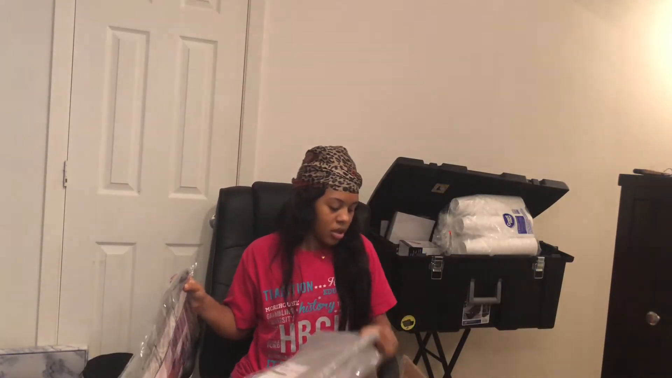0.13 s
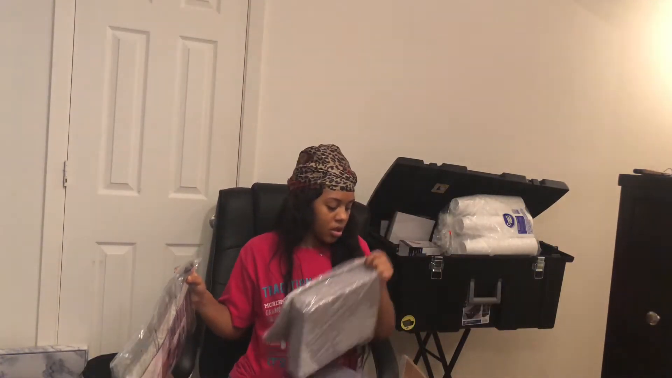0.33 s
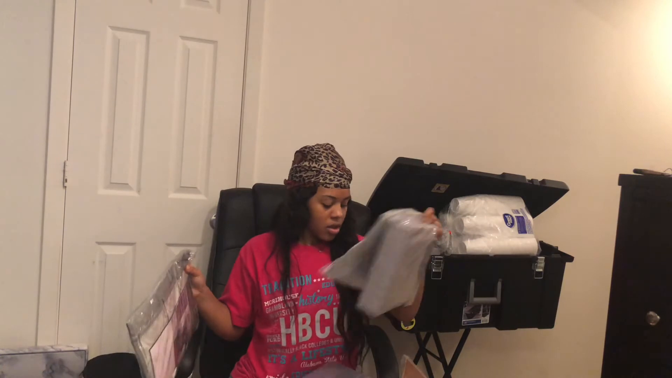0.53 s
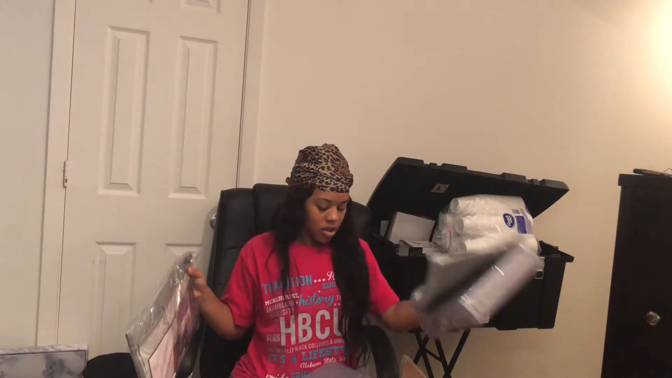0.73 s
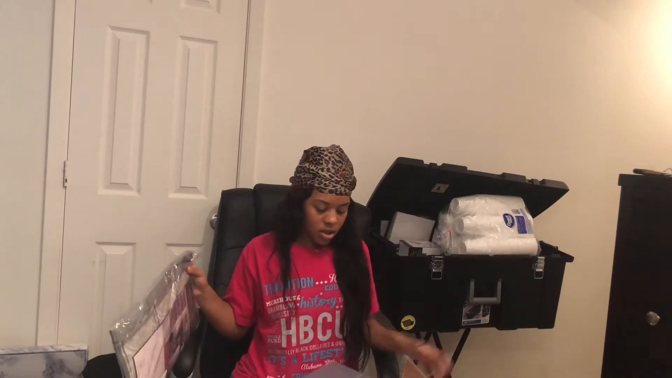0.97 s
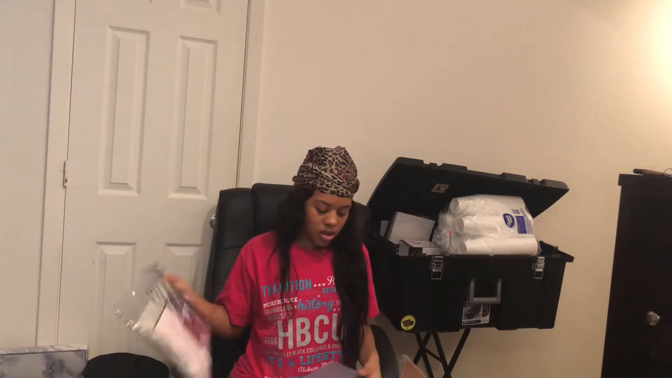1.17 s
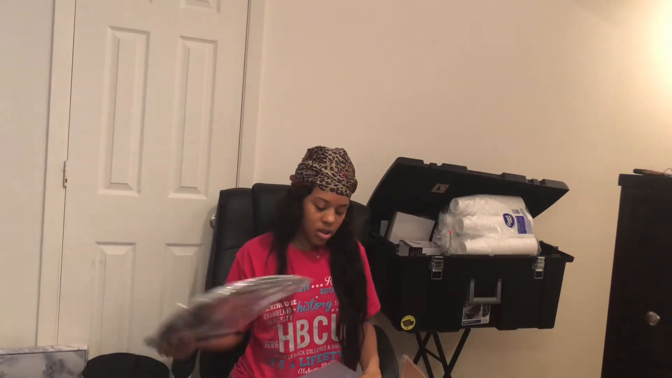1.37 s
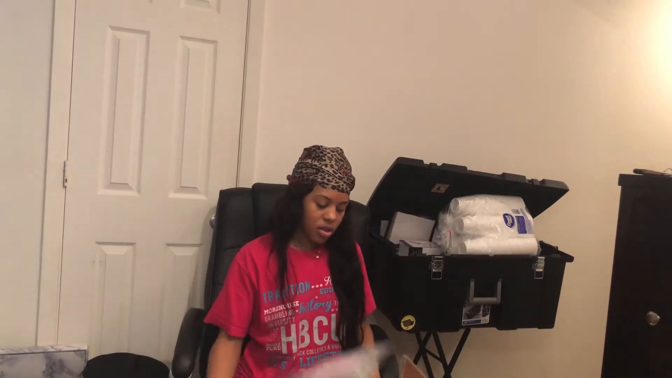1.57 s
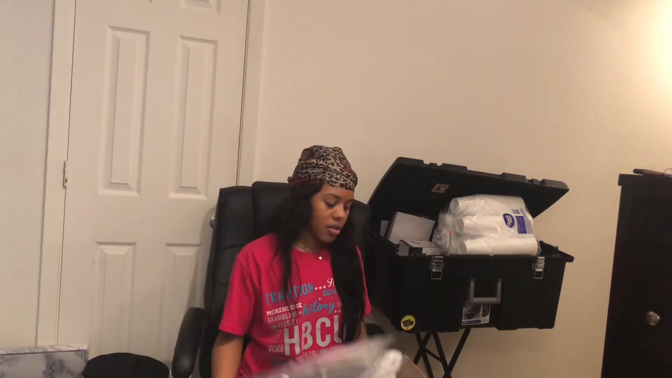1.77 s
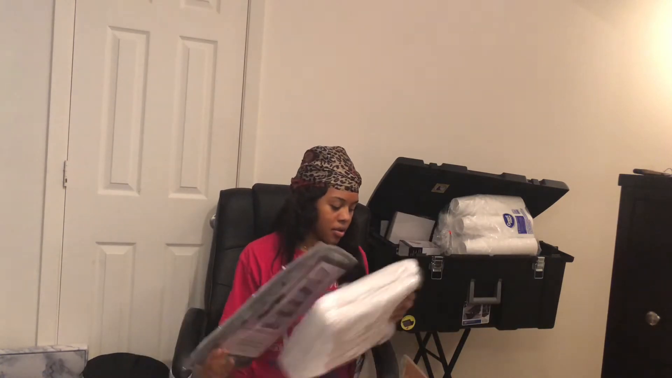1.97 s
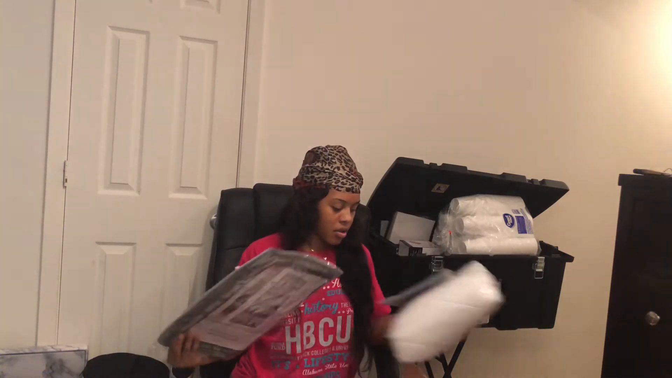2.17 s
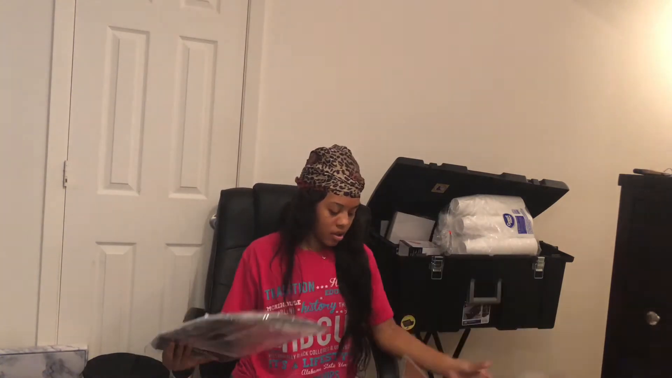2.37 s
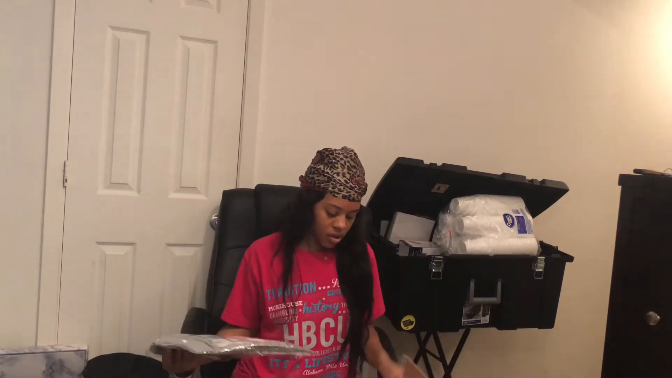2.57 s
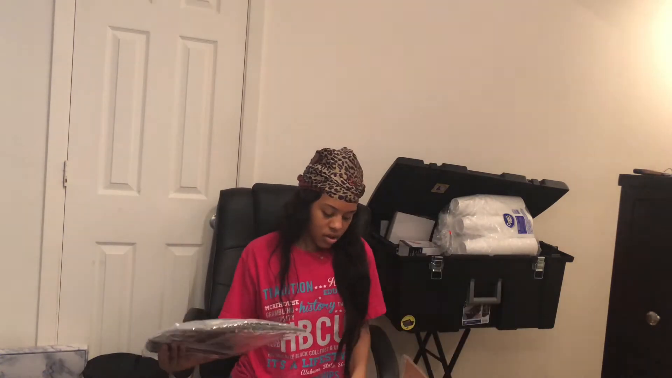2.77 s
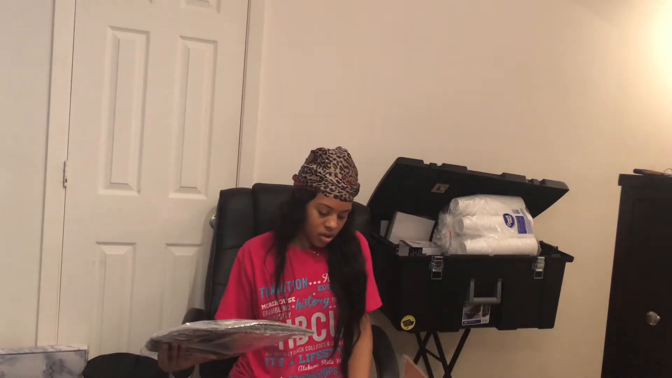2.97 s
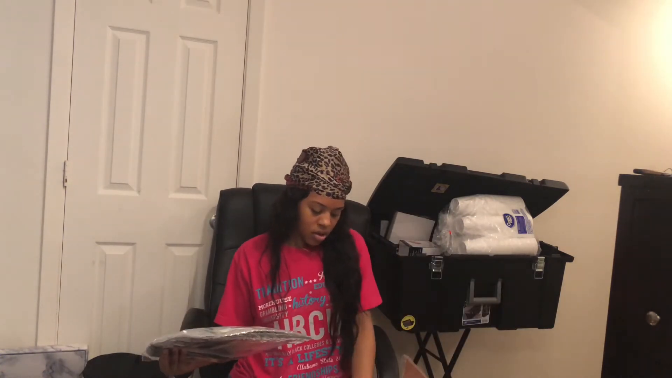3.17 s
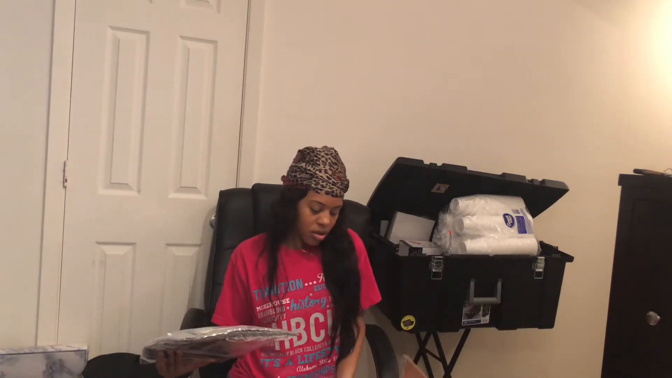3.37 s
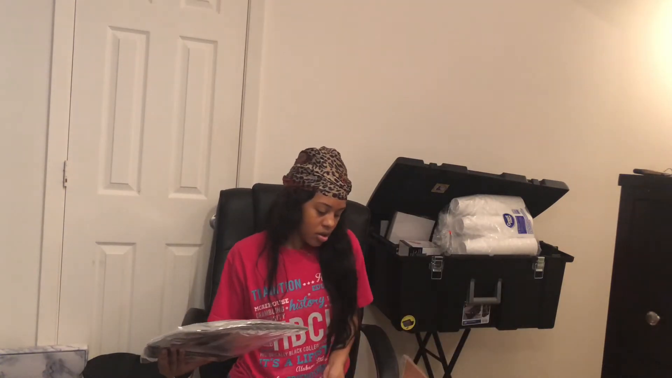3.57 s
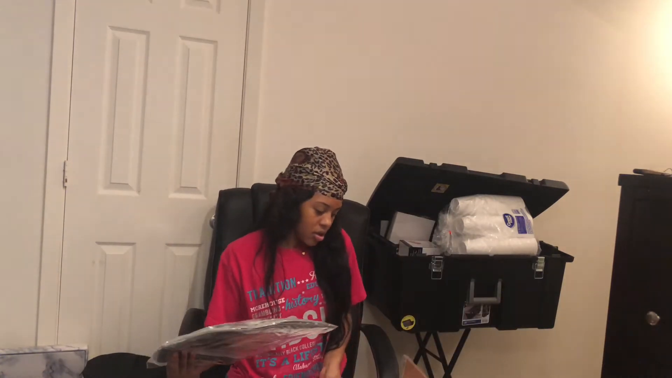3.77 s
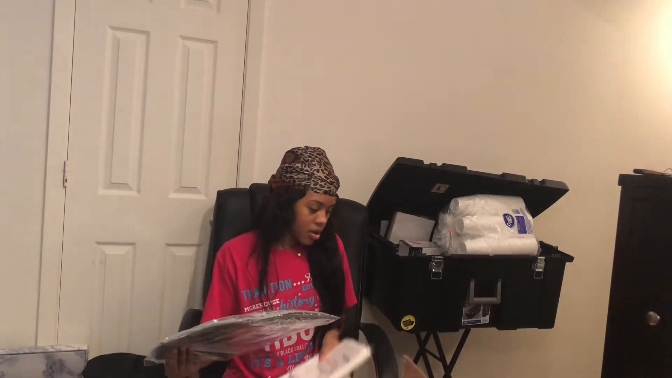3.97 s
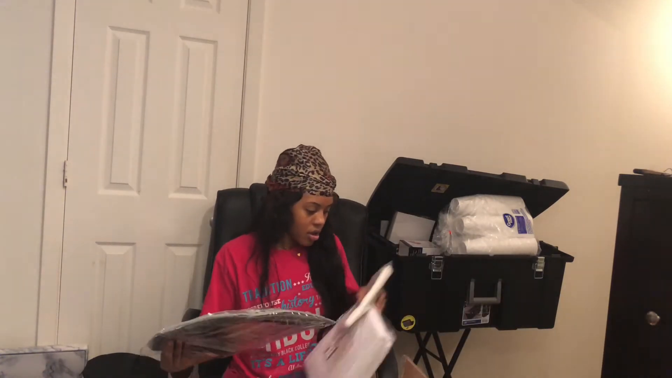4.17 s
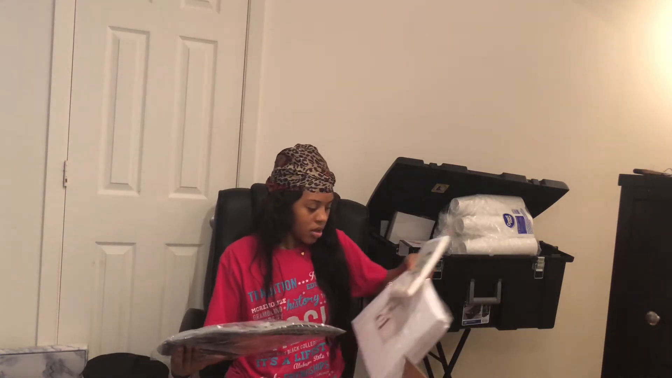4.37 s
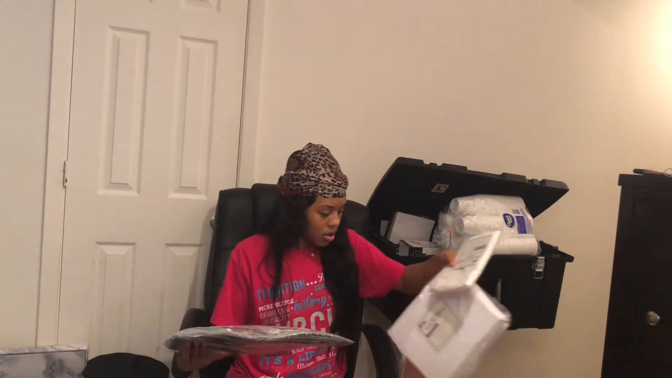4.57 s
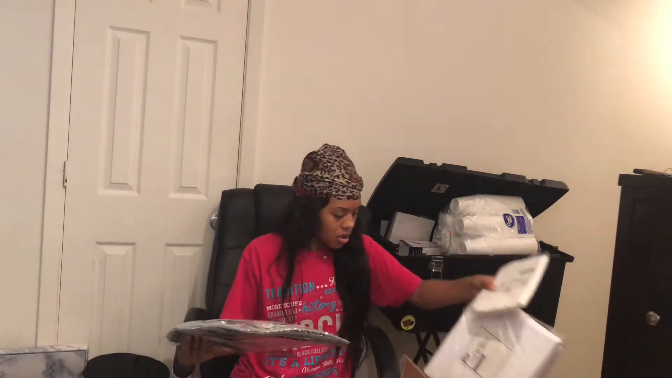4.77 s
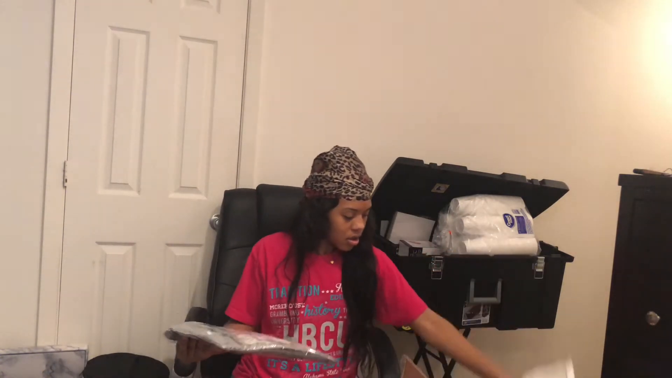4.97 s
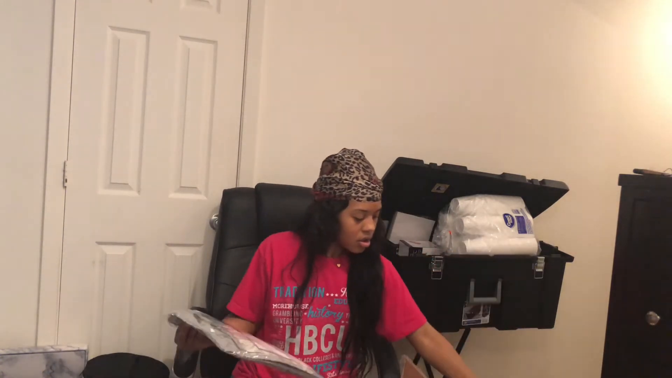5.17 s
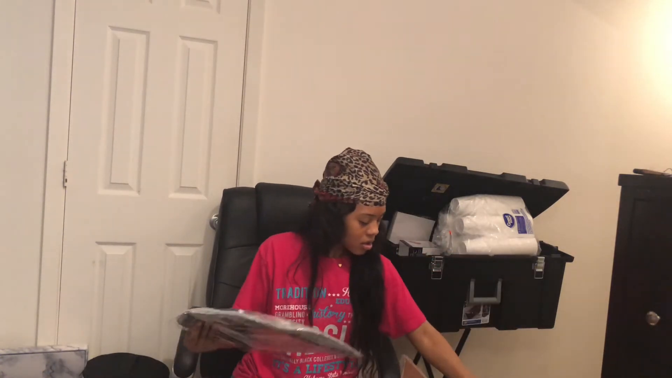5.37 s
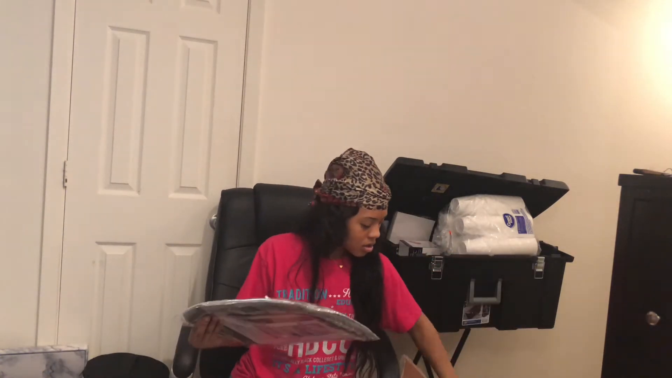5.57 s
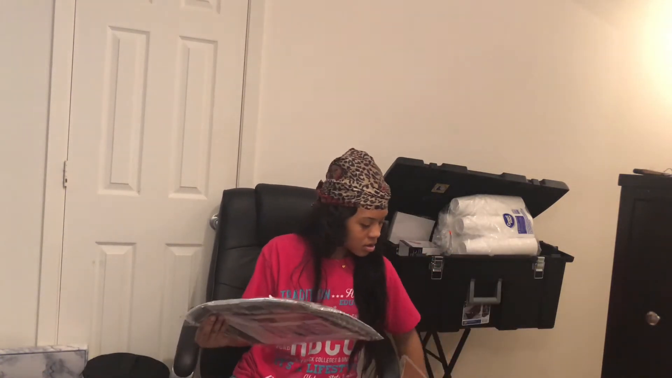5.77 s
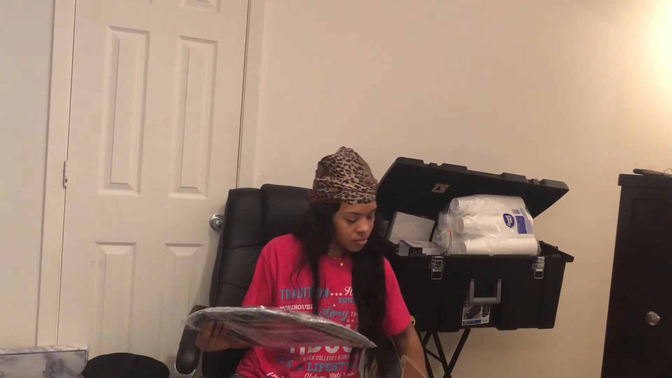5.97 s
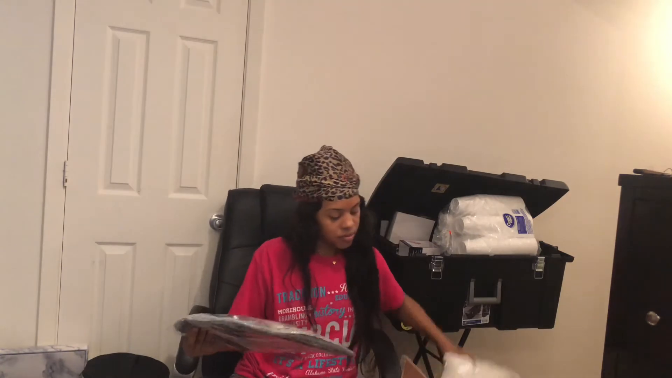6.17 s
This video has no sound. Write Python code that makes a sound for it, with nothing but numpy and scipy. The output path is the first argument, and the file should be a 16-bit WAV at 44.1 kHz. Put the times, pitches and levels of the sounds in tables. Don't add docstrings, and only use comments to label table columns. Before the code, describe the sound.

Plastic-wrapped soft packs are sorted by hand, heard close and dry with a short room echo. Film crinkles irregularly, creases tick, dimples pop and tiny squeaks slip through. Two abrupt crackly thumps stand out in the first half; afterwards the handling is quiet and patchy until a moderate crush and thud near five seconds, then small bumps and rustles. A low hum stays beneath.

```python
import sys
import numpy as np
from scipy import signal
from scipy.fft import rfft, irfft
from scipy.io import wavfile
from scipy.ndimage import uniform_filter1d

SR = 44100
rng = np.random.default_rng(int(sys.argv[2]) if len(sys.argv) > 2 else 0)


def natural_amplitude(level_db):
    exponent = np.asarray(level_db, float) / 20
    return 10 ** exponent


def transcribe(u):
    v = np.clip(np.atleast_2d(u).T, -1, 1)
    q = np.round(v * 32767).astype(np.int16)
    wavfile.write(sys.argv[1], SR, q)


N = 273861


def rms_one(x):
    return x / np.sqrt(np.mean(x ** 2) + 1e-20)


def across(points_hz, values, hz):
    return np.interp(np.log(hz), np.log(points_hz), values)


def drift(rate_hz):
    r = np.exp(-40 * np.pi * rate_hz / SR)
    slow = signal.lfilter([1], [1, -2 * r, r * r], rng.standard_normal(N // 20 + 2002))[2000:]
    return np.interp(np.arange(N) / 20, np.arange(len(slow)), rms_one(slow))


def ring(clicks, hz, t60):
    r = natural_amplitude(-60 / (max(t60, .004) * SR))
    w = 2 * np.pi * hz / SR
    return signal.lfilter([0, np.sin(w)], [1, -2 * r * np.cos(w), r * r], clicks + 1e-18)


def band(x, low_hz, high_hz):
    return signal.sosfilt(signal.butter(2, [low_hz, high_hz], "band", fs=SR, output="sos"), x)


def buckles(per_s, spread_db):
    sizes = natural_amplitude(spread_db * np.minimum(rng.exponential(1, N), 4.5)) * rng.choice([-1, 1], N)
    return rms_one(sizes * (rng.random(N) < per_s / SR))


def swell(t, s, rise_s, hold_s, fall_s, db):
    before = np.maximum(s - t, 0)
    after = np.maximum(t - s - max(hold_s, 0), 0)
    return natural_amplitude(db - 20 * (before / max(rise_s, .002) + after / max(fall_s, .003))) ** 2


def hum():
    # (pitch [Hz], level [dB])
    hum_curve = [(15, -40), (25, -18), (53, 0.5), (76, 1.5), (161, -4), (352, -5.5), (449, -13),
                 (929, -18.5), (3680, -22.5), (5090, -22), (8000, -26.5), (15800, -28)]
    hz = np.maximum(np.fft.rfftfreq(N, 1 / SR), 1)
    shaped = rfft(rng.standard_normal(N)) * natural_amplitude(across(*np.transpose(hum_curve), hz))
    return natural_amplitude(-63.5) * rms_one(irfft(shaped, N))


def handling():
    # (time [s], hold [s], fall [s per 20 dB], rustle [dB], tautness [dB])
    crushes = [(0.0, 0.082, .5, -51, -0.5), (0.25, 0.14, 0.13, -54.5, -0.5),
               (1.026, 0.065, 0.0836, -30.5, 0), (1.16, 0.01, 0.33, -49, -1.5),
               (1.207, 0.038, -0.16, -50.5, -2.5), (1.616, 0.051, 0.12, -43.5, -1),
               (1.883, 0.03, -0.03, -48.5, 4.5), (2.485, 0.011, 0.11, -38.5, -1),
               (2.569, 0.0091, .2, -40, 0), (2.68, 0.26, 0.23, -52, -1), (3.143, 0.14, 0.2, -56, -1.5),
               (3.535, 0.062, 0, -56, -0.5), (3.465, 0.066, -0.5, -63, -1), (3.09, 0.053, -0.7, -62.5, -7),
               (3.782, 0.034, -0.5, -65.5, -4), (1.326, 0.036, 0.2, -64, -7), (3.893, .04, 1, -63, -5),
               (3.935, .05, 0.5, -55, -1), (4.276, 0.006, -0.06, -59, 1), (4.28, 0.009, 0.14, -61, -4),
               (0.487, 0.07, -0.03, -65, -4), (0.7, 0.036, 1, -66.5, -2), (2.135, 0.047, -0.2, -72, -9.5),
               (4.634, 0.016, -0.06, -63, 4), (4.817, 0.015, -0.05, -64.5, -0.5),
               (5.183, 0.0097, 0.04, -52, 5), (4.871, 0.023, 0.16, -59.5, -3),
               (5.025, 0.097, 0.1365, -36.5, 0.5), (5.19, 0.16, 0.02, -49.5, -1.5),
               (5.643, 0.023, -0.03, -61.5, -13), (5.922, 0.065, .3, -61, -2.5)]
    # (peak time [s], rise [s per 20 dB], fall [s per 20 dB], rustle [dB], tautness [dB])
    strokes = [(.18, 0.41, 0.1, -47, 0), (.855, 0.14, 0.28, -49.5, -1), (.965, 0.062, 0.1, -59.5, -8),
               (1.099, 0.019, 0.0659, -30.5, -1), (1.36, 0.12, 0.5, -68.5, -13),
               (1.458, 0.11, 0.14, -58, -5), (1.52, .03, -0.66, -59.5, -10), (1.832, 0.17, 0.0943, -45, -1),
               (2.008, 0.14, 0.03, -52, 0), (2.045, 0.038, 0.03, -57, -10.5),
               (2.407, 0.15, 0.04, -52.5, -3), (2.541, 0.022, 0.0316, -19, 0),
               (3.318, 0.27, 0.15, -50.5, 0.5), (3.69, 0.18, 0.2, -55.5, -1.5),
               (3.854, 0.062, 0.05, -51.5, -1.5), (4.1, 0.19, -0.2, -55, 3.5),
               (4.227, 0.12, -0.03, -60, -1), (4.52, 0.13, 0.08, -58.5, 0), (4.43, .06, 0.3, -64, -3.5),
               (4.58, .05, 0.03, -62, -3), (4.679, 0.04, 0.07, -63.5, -2), (4.741, .04, .06, -65, -3.5),
               (2.25, 0.064, 0.14, -70, -4), (.62, .08, 0.2, -72, -8), (5.0, 0.11, 0.24, -48, 1),
               (5.383, 0.14, 0.07, -50.5, 3.5), (5.557, 0.2, 0.1, -54.5, -2.5), (5.77, 0.098, 6, -69.5, -2),
               (5.86, 0.12, 0.13, -56.5, -5), (6.21, 0.15, 4, -52, -4.5)]
    # (time [s], hold [s], fall [s per 20 dB], rumble [dB])
    drag_rows = [(0.03, 0.083, 0.5, -53.5), (0.264, 0.01, -0.0447, -39.5), (1.042, 0.075, -0.15, -37),
                 (1.345, 0.066, 2.5, -62.5), (1.608, 0.053, 0.21, -42), (1.811, 0.015, 0.19, -44),
                 (2.345, 0.059, -0.4, -58.5), (2.496, 0.047, -0.27, -37.5), (2.547, 0.0035, -0.0232, -27),
                 (2.585, 0.039, -2, -62), (2.695, 0.24, 0.3, -54.5), (3.133, 0.16, 0.47, -53.5),
                 (4.56, 0.081, .05, -64.5), (3.933, 0.043, 0.1, -52), (4.27, 0.0064, 1.8, -70),
                 (5.03, 0.048, 0.1, -41.5), (5.164, 0.089, 0.44, -51.5), (5.65, 0.023, 0.2, -51),
                 (5.788, 0.23, 0.14, -53), (6.147, .1, .1, -51.5)]
    crush_rise_s, drag_rise_s = 0.0042, 0.0095
    gestures = [(s, rise_s, 0, *rest) for s, rise_s, *rest in strokes]
    gestures += [(s, crush_rise_s, *rest) for s, *rest in crushes]
    t, power, taut = np.arange(0, N + 16, 16) / SR, 1e-10, 0
    for *shape, taut_db in gestures:
        gesture = swell(t, *shape)
        power = power + gesture
        taut = taut + taut_db * gesture
    drag = sum(swell(t, s, drag_rise_s, *rest) for s, *rest in drag_rows)
    drag = drag + natural_amplitude(-21.5) ** 2 * power
    curves = (10 * np.log10(power), taut / power, 10 * np.log10(drag))
    return [np.interp(np.arange(N) / SR, t, curve) for curve in curves]


def film(rustle_db, taut_db):
    # (pitch [Hz], level [dB per band])
    film_colour = [(350, 5.5), (700, 6), (1500, 4.5), (3000, 2), (5000, 4), (8000, 3.5), (12000, 2),
                   (16000, 3)]
    zones_hz = [1000, 4200, 11500]
    belly_db = -4 - 1.33 * taut_db
    sheen_db = -6 + 1.53 * taut_db
    light = np.clip((-28 - rustle_db) / 18, .15, 1)
    jerks_db = 1.02 * light * drift(48)
    wide_creases = natural_amplitude(0.24 * drift(44)) * buckles(per_s=700, spread_db=3.0)
    tight_creases = natural_amplitude(1.16 * drift(42)) * buckles(per_s=1200, spread_db=1.5)
    fine = rng.standard_normal((2, N))
    crease_share, hiss_thins = .85, .5
    out, edges = 0, 300 * 2 ** np.arange(0, 6.1, .5)
    for k, (low, high) in enumerate(zip(edges, edges[1:])):
        hz = np.sqrt(low * high)
        belly, middle, sheen = [across(zones_hz, row, hz) for row in np.eye(3)]
        flicker_db = 0.67 * light * drift(45)
        level_db = rustle_db + belly * belly_db + sheen * sheen_db + jerks_db + flicker_db + 2.0
        own_creases = np.roll(wide_creases, 9000 * (1 + k // 2))
        wide = .6 * wide_creases + .8 * own_creases
        mixed = np.sqrt(sheen) * tight_creases + np.sqrt(1 - sheen) * wide
        drive = crease_share * light * mixed + (1 - hiss_thins * light) * fine[k % 2]
        patch = band(natural_amplitude(level_db) * drive, low, high)
        out = out + natural_amplitude(across(*np.transpose(film_colour), hz)) * (-1) ** k * patch
    return out


def creases():
    # (time [s], peak [dB], belly re peak [dB], sheen re peak [dB])
    snap_rows = [(0.0195, -20, -8, 7), (0.1002, -30, -10, 8), (0.1674, -38, -14, 12),
                 (0.1821, -31.5, -5.5, -15), (0.4385, -34, -21, 3), (1.1002, -11, -20, 1),
                 (1.3538, -32.5, -24, 0), (1.4507, -30, -16.5, -1), (1.6076, -40, 4, -6),
                 (1.6256, -33, -10, 15), (1.7765, -30, -6, 3), (1.7943, -35, -6, 0), (1.83, -20, -12, 3),
                 (2.0066, -38, -0.5, -4), (2.151, -53.5, 3, -12), (2.203, -43.5, -21, -5),
                 (2.3433, -38.5, -1.5, -1), (2.4004, -36.5, -0.5, 10), (2.4943, -33, -20, 15),
                 (2.5449, -8, -31, -10), (2.537, -11, -7, 1), (2.9006, -40.5, 1, 11),
                 (3.073, -40, -16, -17), (3.2325, -45, -19, -16.5), (3.8344, -40, -14, 9),
                 (4.008, -38.5, -8, 5), (4.275, -30, -29, -6), (5.852, -55, 1, -14), (5.0225, -36, -10, -3),
                 (5.3723, -31.5, -16, -1)]
    # (time [s], peak [dB], sheen re peak [dB])
    tick_rows = [(0.2013, -28.5, 16), (0.378, -39.5, 16), (0.4475, -35, 13), (0.702, -46.5, -3),
                 (0.822, -42, 10), (1.419, -51, 20), (1.4334, -46, 16), (1.4932, -51, 16.5),
                 (1.764, -51, 7), (2.1683, -46.5, 17), (2.359, -43, 6), (2.4478, -42.5, 12),
                 (3.017, -38.5, 17), (3.3288, -45, 22), (3.069, -38, 17), (3.2118, -39, 16),
                 (3.27, -37, 18), (3.322, -43, 7), (3.3602, -38, -2), (3.418, -53, 19), (3.532, -40, 13),
                 (3.6203, -43, 13), (3.676, -39, 9.5), (3.759, -48, 8), (4.2155, -40.5, 6),
                 (4.6316, -48, 11), (4.8155, -52, 12), (4.985, -33.5, 7), (5.57, -39.5, 5), (6.166, -40, 2),
                 (.1078, -40, 9), (.158, -45, 9), (.175, -38, 17), (.218, -42, 8), (1.66, -35, 12),
                 (1.81, -33, -6), (2.28, -57, -3), (2.404, -39.5, 12), (2.409, -40, 16), (3.006, -48, 9),
                 (3.048, -46, 11), (3.22, -46, 8), (3.237, -44, 0), (3.248, -39, -2), (3.274, -40, 12),
                 (3.284, -41, -4), (3.35, -45, -4), (3.366, -41.5, 15)]
    # (time [s], peak [dB], sheen re peak [dB])
    crinkle_rows = [(0.2438, -39, 10.5), (0.3314, -45, -4), (0.358, -43, -6), (0.7915, -44, 4),
                    (1.4635, -44, 15), (1.6157, -42, 20), (2.303, -51, -5), (2.3236, -45, -9.5),
                    (2.9451, -49, 3), (3.037, -42, -6), (3.0923, -40, 8), (3.179, -41.5, 15),
                    (3.311, -42, 12), (3.385, -45, 5), (3.4962, -46, 4), (3.5163, -43, -1),
                    (3.5765, -41, 3), (3.645, -41.5, 10), (3.929, -42, 1), (4.5106, -46, 5.5),
                    (4.5701, -44.5, 3), (4.69, -45, -8), (4.729, -52, -2), (4.8566, -53.5, 10.5),
                    (4.8807, -50, 2), (4.891, -46, -10), (4.903, -39, 2), (4.9184, -42, 8),
                    (4.961, -38.5, 0), (5.4138, -61, -12)]
    tick_belly_db, crinkle_belly_db = -8.5, -11
    ticks = [(s, db, tick_belly_db, sheen_db) for s, db, sheen_db in tick_rows]
    crinkles = [(s, db, crinkle_belly_db, sheen_db) for s, db, sheen_db in crinkle_rows]
    return [*snap_rows, *ticks, *crinkles]


def snaps():
    # (low edge [Hz], high edge [Hz])
    zone_edges_hz = [(600, 2500), (2500, 7000), (7000, 18000)]
    # (delay [s], level [dB])
    reflections = [
        (.0008, -16),
        (.0023, -8.5),
        (.0052, -16),
    ]
    out, after = np.zeros(N + 1000), np.arange(1000) / SR
    tearing = rng.standard_normal((120, 1000))
    stretch = rng.uniform(.8, 1.25, size=120)
    for (s, peak_db, belly_db, sheen_db), noise, far in zip(creases(), tearing, stretch):
        burst = noise * np.exp(-after / 0.00013)
        snap = np.zeros(1000)
        levels_db = (belly_db, 2.5, sheen_db - 6.0)
        for (low, high), db, sign in zip(zone_edges_hz, levels_db, (1, -1, 1)):
            zone = band(burst, low, high)
            snap += sign * natural_amplitude(peak_db + db) * zone / np.abs(zone).max()
        snap += sum(natural_amplitude(db) * np.roll(snap, round(lag * far * SR)) for lag, db in reflections)
        i = max(round(s * SR) - 8, 0)
        out[i:i + 1000] += snap
    return out[:N]


def struck(rows, cycles, gain_db):
    out, after = np.zeros(N + 3000), np.arange(3000) / SR
    for (s, peak_db, hz), noise in zip(rows, rng.standard_normal((60, 3000))):
        contact = noise * np.exp(-after * hz / 0.81)
        tone = ring(contact, hz, cycles / hz) + 0.51 * ring(contact, 1.27 * hz, cycles / hz / 2)
        i = round(s * SR)
        out[i:i + 3000] += natural_amplitude(peak_db + gain_db) * tone / np.abs(tone).max()
    return out[:N]


def corner_knocks():
    # (time [s], peak [dB], pitch [Hz])
    knock_rows = [(.022, -42, 504), (.142, -41, 910), (.263, -33, 800), (.3, -53, 594), (.318, -45, 726),
                  (1.026, -22, 1136), (1.047, -34, 320), (1.063, -32, 350), (1.068, -30, 950),
                  (1.072, -21.5, 1700), (1.088, -23, 490), (1.097, -17, 1880), (1.138, -41, 490),
                  (1.612, -43, 594), (1.83, -31.5, 750), (2.484, -33, 825), (2.532, -35, 1450),
                  (2.5435, -22.5, 380), (2.57, -34, 800), (2.595, -34, 1190), (5.043, -36.5, 457),
                  (5.087, -35, 706), (5.645, -49, 800), (5.652, -47, 2300), (5.664, -55, 800),
                  (5.683, -48, 550), (5.851, -37.5, 785), (5.853, -47, 1800), (6.17, -48, 710)]
    return struck(knock_rows, cycles=20, gain_db=0)


def drags(rumble_db):
    sliding = rms_one(band(buckles(per_s=700, spread_db=1.5), 120, 566))
    return natural_amplitude(rumble_db - 3.5) * sliding


def dimple_pops():
    # (time [s], peak [dB], pitch [Hz])
    pop_rows = [(0.0563, -40, 3090), (0.1734, -33, 2360), (0.216, -37, 2720), (0.262, -36, 1510),
                (0.2944, -39, 5270), (0.6579, -49, 2350), (0.7233, -43, 3260), (0.7514, -48, 3550),
                (0.7766, -45, 4050), (0.852, -27, 5330), (0.946, -39, 3600), (1.2263, -26, 2670),
                (2.6868, -35.5, 2500), (2.741, -35.5, 3570), (2.7924, -38, 2870), (2.862, -39, 2160),
                (3.1638, -35, 1970), (3.1986, -38, 3650), (3.4504, -53, 4270), (3.471, -46.5, 1740),
                (4.3834, -53, 1620), (4.4184, -54, 4830), (4.4378, -54, 3140), (4.477, -45, 3030),
                (4.4972, -40, 3520), (4.5264, -48, 4760), (4.5486, -43, 4150), (4.5844, -51, 2510),
                (4.6444, -51, 6550), (4.6644, -49, 3980), (4.6886, -37, 3800), (4.7364, -52.5, 2060),
                (4.925, -38, 3910), (5.1876, -41, 6220), (5.1876, -32, 6100), (5.474, -53, 4620),
                (5.5363, -43.5, 3400), (5.6476, -46, 1670), (5.9474, -44, 3630), (6.1244, -53, 1550),
                (6.164, -33, 2190)]
    return struck(pop_rows, cycles=10, gain_db=-6.5)


def thuds():
    # (time [s], peak [dB], hollow pitch [Hz], slap re peak [dB])
    thud_rows = [(0.137, -44, 378, -2), (0.259, -33.5, 337, -13), (0.494, -56, 553, -1.5),
                 (1.022, -39, 483, -3), (1.067, -27.5, 146, -5.5), (1.096, -20.5, 151, -10.5),
                 (1.135, -32, 219, -16), (1.621, -39.5, 363, -4), (1.699, -49, 197, -10),
                 (1.828, -33.5, 394, -9), (1.989, -48, 219, -28), (2.481, -29.5, 405, -5.5),
                 (2.5407, -16, 249, -24), (2.566, -31.5, 218, -9.5), (3.139, -46.5, 354, -17),
                 (3.939, -49, 190, -19), (3.982, -44.5, 298, -16), (4.272, -49.5, 400, -7),
                 (5.041, -30.5, 186, -5.5), (5.661, -40.5, 438, -25), (5.803, -43, 410, -12),
                 (5.849, -38, 402, -7), (5.873, -48, 442, -8), (5.966, -40, 448, -17),
                 (6.018, -45.5, 179, -16), (6.135, -54, 201, -8), (5.661, -39.5, 149, -18),
                 (5.973, -43.5, 160, -17), (1.658, -42.5, 112, -3), (6.069, -49, 96, -15)]
    # (pitch [Hz], level [dB], t60 [s])
    floorboards = [(79.6, -4.5, 0.32), (186.6, -4.5, 0.27), (219.3, 1.5, 0.26), (294, -20, 0.089),
                   (352.6, 0, 0.14), (417, -19, 0.08)]
    out, pushes, slaps = np.zeros(N), np.zeros(N), np.zeros(N)
    after = np.arange(5000) / SR
    strengths_db = rng.normal(0, 2.5, (len(thud_rows), len(floorboards)))
    at = [round((row[0] + 0.00363) * SR) for row in thud_rows]
    peaks_db = np.array(thud_rows)[:, 1]
    contact = 1 - np.exp(-after / 0.00097)
    for i, (s, peak_db, hz, slap_db) in zip(at, thud_rows):
        hollow = ring(after == 0, hz, t60=0.077)
        hollow = hollow + natural_amplitude(slap_db) * ring(after == 0, 1.765 * hz, t60=0.053)
        slap = natural_amplitude(peak_db + slap_db + 4.5 - 60 * after / 0.057) * contact
        out[i:i + 5000] += (natural_amplitude(peak_db - 1.0) * hollow * contact)[:N - i]
        slaps[i:i + 5000] += slap[:N - i]
    for k, (hz, level_db, t60) in enumerate(floorboards):
        pushes[at] = natural_amplitude(peaks_db + level_db - 12.0 + strengths_db[:, k])
        out += ring(pushes, hz, t60)
    out += slaps * rms_one(band(rng.standard_normal(N), 254, 1380))
    return band(out, 73, 6400)


def squeaks():
    # (time [s], length [s], pitch [Hz], level [dB])
    squeak_rows = [
        (.44, .045, 2090, -64),
        (.495, .02, 4700, -67),
        (.54, .025, 2110, -64),
        (.58, .07, 2110, -71),
        (.545, .03, 4150, -69),
        (.555, .045, 4630, -67),
        (5.155, .03, 5600, -55),
        (6.03, .07, 1890, -62),
        (6.115, .03, 1550, -63),
        (5.87, .025, 920, -60),
    ]
    t, out = np.arange(N) / SR, np.zeros(N)
    waver, flutter = drift(26), drift(45)
    for k, (s, length_s, hz, level_db) in enumerate(squeak_rows):
        span = slice(round((s - .02) * SR), round((s + length_s + .1) * SR))
        pitch = hz * (1 + .008 * np.roll(waver, 9000 * k)[span])
        phase = 2 * np.pi * np.cumsum(pitch) / SR
        shape = np.sqrt(swell(t[span], s, 0.01, length_s, 0.022, level_db))
        out[span] += shape * natural_amplitude(4.5 * np.roll(flutter, 9000 * k)[span]) * np.sin(phase)
    return out


def box_rings():
    # (time [s], peak [dB], pitch [Hz])
    box_rows = [
        (5.646, -49, 453),
        (5.663, -56, 452),
        (5.806, -46, 434),
        (5.852, -50, 410),
        (5.875, -47, 447),
        (5.97, -53, 450),
        (3.14, -49, 360),
        (3.3, -58, 350),
    ]
    return struck(box_rows, cycles=44, gain_db=0)


def room(x):
    split_hz, t60_s, treble_t60_s = 2230, 0.38, 0.17
    after = np.arange(SR // 2) / SR
    scatter = rng.standard_normal((2, len(after))) * np.clip(after / 0.00033, 0, 1)
    echoes = band(scatter[0], 60, split_hz) * natural_amplitude(-60 * after / t60_s)
    echoes += 0.61 * band(scatter[1], split_hz, 21800) * natural_amplitude(-60 * after / treble_t60_s)
    return signal.fftconvolve(x, echoes / np.sqrt(np.sum(echoes ** 2)))[:N]


def scene():
    rustle_db, taut_db, rumble_db = handling()
    near = film(rustle_db, taut_db) + snaps() + dimple_pops() + squeaks()
    near = near + thuds() + drags(rumble_db) + corner_knocks() + box_rings()
    return (near + natural_amplitude(-15.5) * room(near) + hum())[None]


def low_pass(x):
    return signal.sosfilt(signal.butter(12, 17150, fs=SR, output="sos"), x)


def record(dry):
    steady_top_hz, sudden_top_hz, sudden_top_db = 15950, 16850, -9
    hz, spectrum = np.fft.rfftfreq(N, 1 / SR), rfft(dry)
    steady, wide = [irfft(spectrum * np.clip((top - hz) / 200, 0, 1), N)
                    for top in (steady_top_hz, sudden_top_hz)]
    extra = wide - steady
    power = extra ** 2
    sudden = uniform_filter1d(power, size=128) > 9 * uniform_filter1d(power, size=2048)
    opened = np.clip(3 * uniform_filter1d(1. * sudden, size=200), 0, 1)
    mix = steady + natural_amplitude(sudden_top_db) * opened * extra
    return low_pass(mix)


dry = scene()
out = record(dry)
transcribe(out)
```